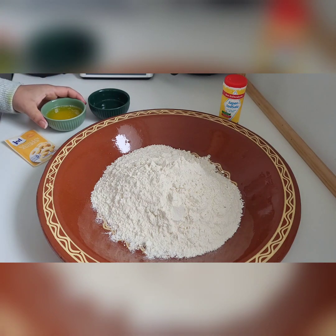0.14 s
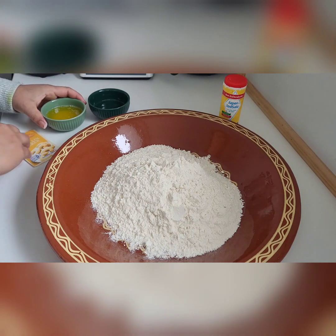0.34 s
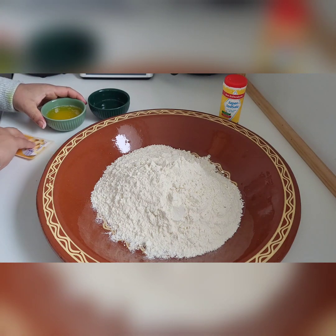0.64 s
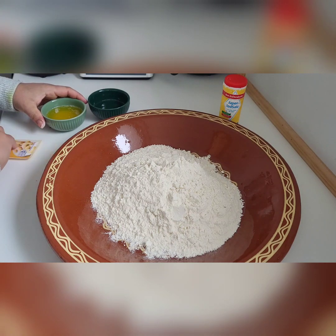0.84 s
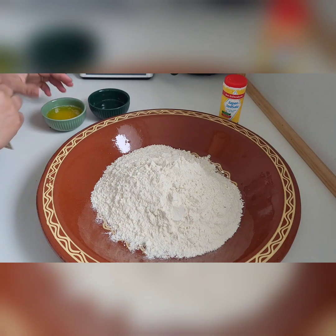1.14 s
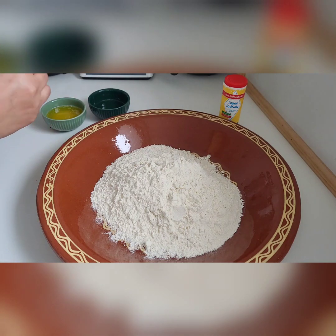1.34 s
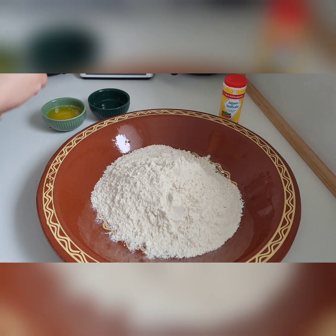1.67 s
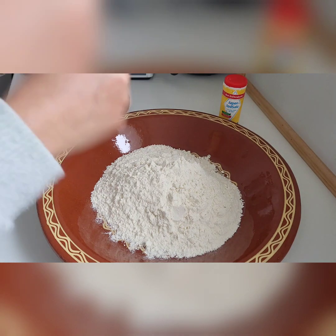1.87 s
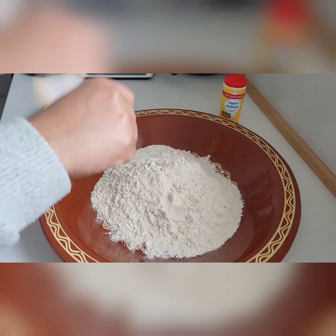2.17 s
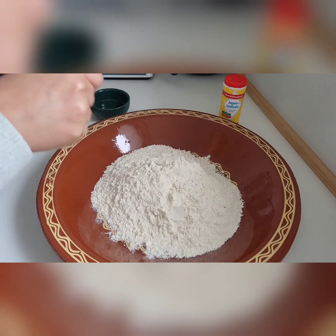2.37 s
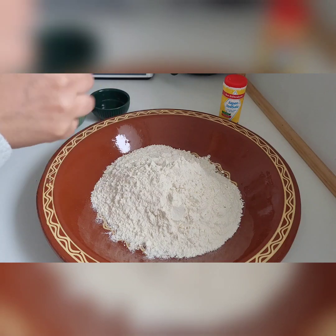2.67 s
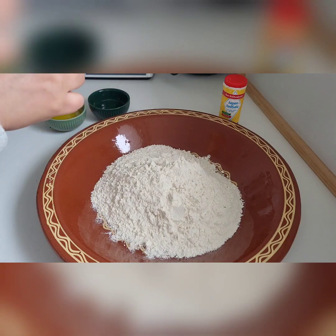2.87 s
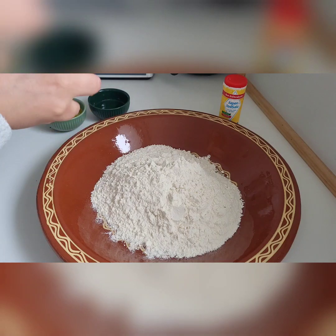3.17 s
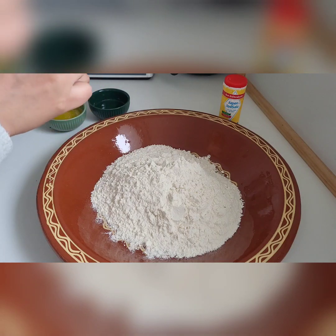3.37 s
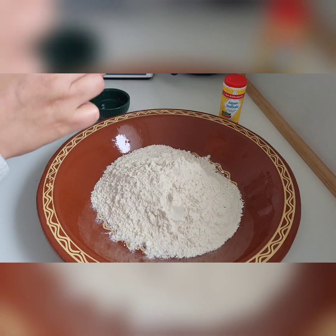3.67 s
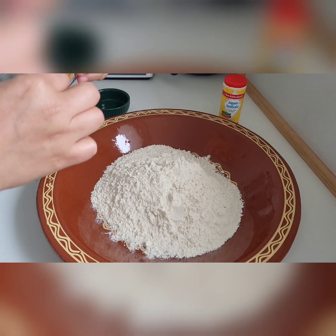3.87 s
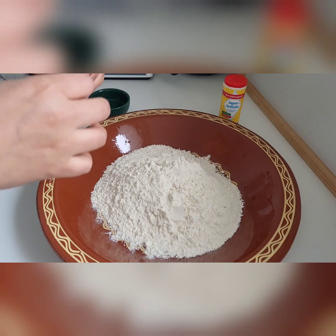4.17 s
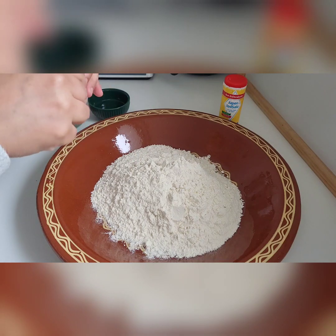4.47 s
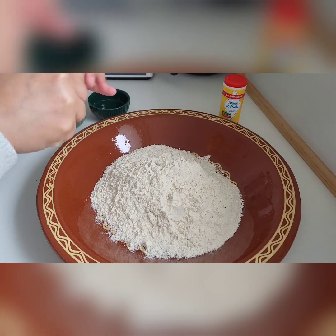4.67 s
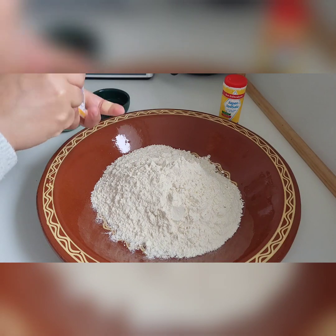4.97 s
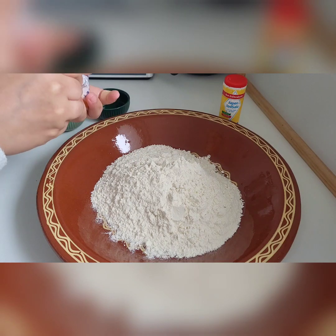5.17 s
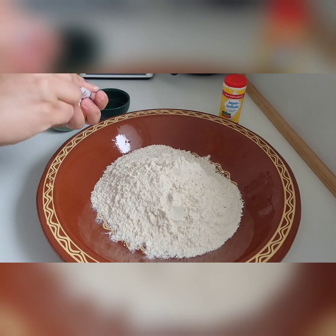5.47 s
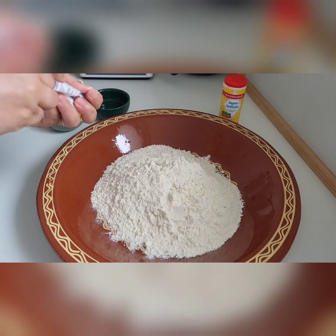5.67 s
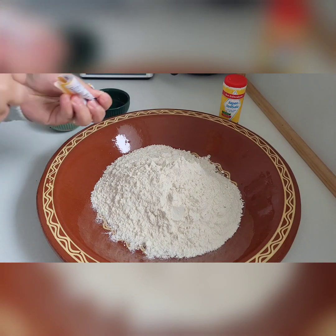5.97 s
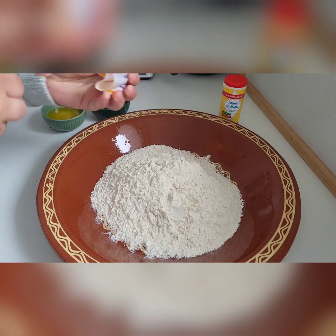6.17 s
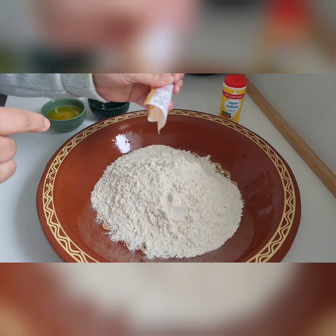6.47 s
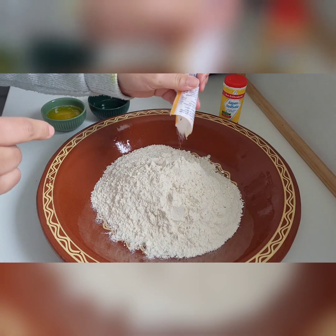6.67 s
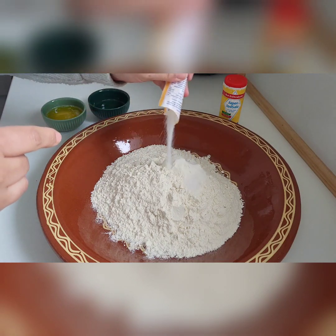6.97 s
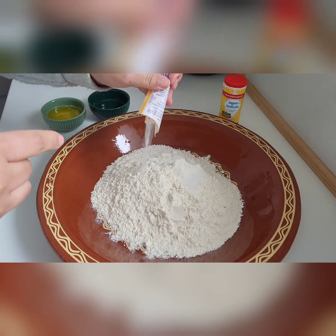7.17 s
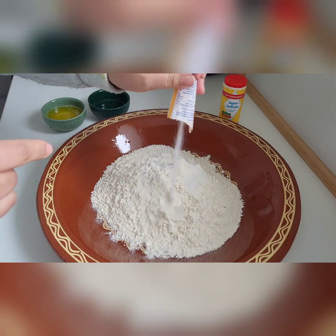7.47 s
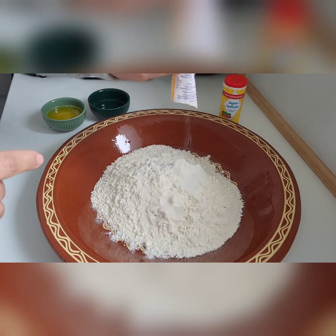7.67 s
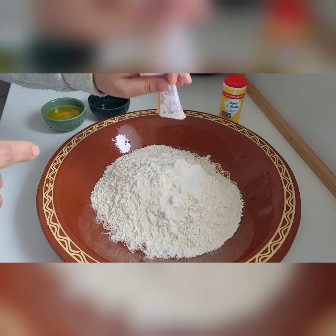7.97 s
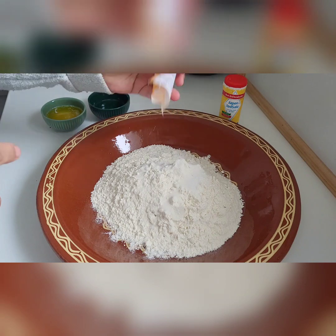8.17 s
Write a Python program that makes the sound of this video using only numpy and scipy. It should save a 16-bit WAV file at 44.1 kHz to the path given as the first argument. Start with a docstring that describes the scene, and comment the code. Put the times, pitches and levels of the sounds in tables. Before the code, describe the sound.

Crinkly paper packet handling: brisk shaking, small crackles, one short dry rip, more crumpling, then a quiet powdery trickle in a softly humming kitchen.

```python
"""Paper sachet in a kitchen

A sachet is slid off a counter, shaken, creased, torn open and emptied, over a faint appliance hum.
Buckling folds are noise bursts in a resonance with decaying panel modes; friction, fibres and powder
are random grains of coloured noise; the hum is a sum of sines. Diffuse decaying echoes answer the paper."""
import sys
import numpy as np
from scipy import signal
from scipy.fft import rfft, irfft, next_fast_len
from scipy.io import wavfile
from scipy.ndimage import map_coordinates

SR = 44100
rng = np.random.default_rng(int(sys.argv[2]) if len(sys.argv) > 2 else 0)


def int16_out(signal):
    """Quantize to a 16-bit WAV file."""
    q = np.round(np.clip(np.atleast_2d(signal).T, -1, 1) * 32767)
    wavfile.write(sys.argv[1], SR, q.astype(np.int16))


N = 367353
TIME = np.arange(N) / SR

# Levels in the tables are relative: each source trims its layers as it mixes them.
# Lines of the hum. Each row: frequency in Hz, level in dB.
HUM_LINES = [(49.3, 2), (98.6, -17), (147.9, -17), (202, -26.5)]
# Spectrum of the still air. Each row: frequency in Hz, gain in dB.
AIR_SPECTRUM = [(20, -18), (45, -2.5), (70, 5.5), (130, -6.5), (200, -11), (320, -12.5), (450, -24),
                (800, -30), (1300, -34), (1850, -22.5), (2600, -37.5), (5000, -37), (16000, -37.5)]
# Pushes along the counter. Each row: start in seconds, length in seconds, attack in seconds,
# friction level in dB, flexing panel level in dB.
SLIDE_STROKES = [(0.22, 0.08, .03, -59, -74.5), (0.33, .14, .02, -66, -76), (0.492, .05, .006, -48, -61),
                 (0.552, 0.043, 0.0024, -38, -50), (0.63, 0.23, 0.013, -48.5, -70),
                 (0.793, .04, .002, -48, -54.5), (0.876, 0.063, 0.0045, -47, -57)]
# Spectrum of paper scuffing over the counter. Each row: frequency in Hz, density in dB per Hz.
FRICTION_SPECTRUM = [(1500, -14), (2800, -12.5), (4500, -4.5), (6000, -5), (6900, -5), (7500, -2),
                     (8100, -3), (10500, -12.5), (14000, -8), (16000, -8)]
# Spectrum of the flexing paper panel. Each row: frequency in Hz, density in dB per Hz.
PANEL_SPECTRUM = [(100, -19.5), (250, -21.5), (450, -10), (750, -7.5), (1050, -5), (1300, -4), (1600, 1),
                  (2100, -3.5), (2700, -2), (3500, -10.5), (7000, -32)]
# Buckling folds. Each row: start in seconds, crack level in dB, crack resonance in Hz,
# panel level in dB, panel main mode in Hz.
FOLD_SNAPS = [(0.493, -41.5, 9700, -59, 700), (0.5483, -39.5, 6600, -42.5, 1500),
              (0.5697, -25.5, 7000, -49, 1800), (0.7905, -31, 7100, -44, 2550),
              (0.8739, -37, 6000, -43, 1690), (0.957, -43.5, 4680, -51.5, 1510),
              (1.0643, -34.5, 6700, -41, 2780), (1.128, -29.5, 5630, -65, 2680),
              (1.1425, -40, 7300, -52, 2300), (1.272, -47, 6070, -49, 854), (1.3366, -40, 6060, -44, 2740),
              (1.4607, -25.5, 7950, -34.5, 1430), (1.4716, -26, 7150, -33, 1450),
              (1.6057, -55, 4100, -36, 2625), (1.666, -31.5, 6840, -41.5, 2400),
              (1.6855, -31.5, 6200, -30.5, 2590), (1.741, -26, 7050, -27, 2500),
              (1.79, -34, 6340, -34.5, 1500), (1.8414, -23.5, 6100, -33, 1860),
              (1.8873, -29, 6420, -32, 1700), (1.896, -18, 7800, -21, 1670), (1.92, -19, 6610, -38.5, 2400),
              (1.9321, -17, 6640, -19.5, 2720), (2.0207, -15.5, 4410, -26.5, 2700),
              (2.0442, -18.5, 6200, -26, 2280), (2.1283, -25, 6500, -29, 2390),
              (2.1438, -20.5, 7050, -17.5, 1810), (2.174, -19.5, 6560, -28, 2400),
              (2.1866, -20, 7850, -50, 1680), (2.2247, -24.5, 7150, -28, 1720),
              (2.2394, -41, 5800, -36, 1690), (2.2705, -27, 6400, -33.5, 2700),
              (2.2899, -20, 5700, -24, 2240), (2.394, -33, 5230, -32.5, 1640),
              (2.4107, -32.5, 5900, -41, 1550), (2.472, -61, 6000, -39, 2420),
              (2.5305, -34, 5830, -37, 2030), (2.5954, -38.5, 6900, -41.5, 2420),
              (2.6231, -30, 6300, -35, 2500), (2.691, -30.5, 9900, -40.5, 2450),
              (2.7478, -41, 7400, -43, 1420), (2.7694, -45, 6700, -43, 1410),
              (2.8874, -33.5, 6400, -37.5, 1535), (2.9006, -30.5, 5570, -34.5, 2360),
              (2.9694, -24.5, 7360, -28.5, 1710), (3.0653, -28, 6100, -42, 1660),
              (3.1915, -36, 5800, -35, 1800), (3.2587, -37, 6150, -50, 1650),
              (3.347, -35, 9450, -46.5, 1240), (3.365, -35.5, 5200, -42, 1370),
              (3.444, -44, 5600, -36, 1470), (3.4598, -46, 6100, -36, 1430), (3.4852, -36, 5900, -36, 1560),
              (3.8342, -27, 10200, -50, 1540), (4.0762, -51, 10200, -82, 2500),
              (4.1395, -39, 6740, -49, 1520), (4.4891, -38, 5000, -45, 1370),
              (4.601, -36.5, 7750, -44, 1520), (4.6846, -33, 4850, -36, 1900),
              (4.7868, -40.5, 5300, -42.5, 1490), (5.034, -29.5, 7450, -29.5, 2334),
              (5.0806, -26.5, 7100, -27.5, 2180), (5.1339, -25, 5900, -27, 2415),
              (5.223, -39, 5700, -38, 1530), (5.2368, -38.5, 6250, -30.5, 2210),
              (5.2472, -36, 4700, -33, 1880), (5.3082, -53, 4300, -33.5, 1875),
              (5.3576, -42.5, 6600, -46, 2280), (5.389, -44, 4700, -32.5, 1610),
              (5.4296, -30.5, 5650, -35, 1830), (5.4406, -50, 5400, -36, 960),
              (5.478, -27.5, 5070, -42, 1570), (5.4913, -26, 5900, -26, 1565),
              (5.6188, -47, 7800, -39, 1950), (5.6522, -39, 6700, -35, 1570), (5.967, -32, 5700, -27, 1660),
              (6.3135, -35, 5400, -45, 1950), (7.847, -49.5, 8700, -69.5, 1800),
              (7.9068, -48.5, 8700, -71, 1820), (8.1769, -53.5, 8800, -73.5, 1800)]
# Colour shared by all snaps. Each row: frequency in Hz, gain in dB.
SNAP_SPECTRUM = [(100, 0.5), (250, 1.5), (450, -1), (750, -0.5), (1100, -3), (3000, -0.5), (4200, 1),
                 (6500, -3.5), (8200, 1.5), (10000, -5.5), (13500, 1.5), (16000, 3.5)]
# Finger strokes. Each row: start in seconds, length in seconds, attack in seconds,
# crackle level in dB, flexing panel level in dB.
FINGER_STROKES = [(1.065, 0.12, 0.0023, -49, -47.5), (1.26, 0.062, 0.0052, -53.5, -51.5),
                  (1.58, 0.14, 0.014, -52, -51), (1.688, .15, .002, -52, -45),
                  (1.843, 0.046, .002, -38.5, -48), (2.38, 0.086, .01, -45, -40),
                  (2.53, .25, 0.0081, -42.5, -55), (2.89, 0.029, 0.0092, -42, -35),
                  (2.97, 0.13, .002, -55, -43.5), (3.192, 0.063, .002, -53, -56),
                  (3.352, 0.12, 0.0023, -41.5, -38), (3.96, 0.065, .02, -49, -54.5),
                  (4.145, 0.12, .003, -62, -54), (4.26, 0.037, 0.01, -55, -68),
                  (4.415, 0.065, .004, -56.5, -67.5), (4.49, 0.029, 0.0022, -51, -62),
                  (4.57, 0.048, 0.0082, -45.5, -45), (4.604, 0.079, 0.0042, -38.5, -46.5),
                  (4.72, 0.1, 0.011, -49, -53), (4.945, 0.031, 0.012, -44.5, -55),
                  (5.035, 0.14, 0.0091, -37, -35.5), (5.232, 0.026, .007, -40, -34),
                  (5.39, 0.15, .006, -53.5, -45.5), (5.488, 0.056, .004, -42, -36.5),
                  (5.59, 0.18, 0.0099, -46, -52), (5.815, 0.048, .006, -46, -53.5),
                  (6.03, 0.11, .015, -48.5, -56), (6.24, 0.19, .03, -68, -81),
                  (6.44, 0.069, 0.026, -42.5, -58.5), (6.58, 0.042, 0.026, -47.5, -63),
                  (7.6, 0.12, .03, -61, -76.5), (7.85, 0.095, 0.039, -55.5, -67),
                  (7.97, 0.092, .008, -59.5, -63.5), (8.18, 0.033, 0.019, -55, -67.5),
                  (8.24, 0.11, .02, -65.5, -71)]
# Spectrum of fine wrinkles under the fingers. Each row: frequency in Hz, density in dB per Hz.
CRACKLE_SPECTRUM = [(1500, -24), (2800, -5.5), (4000, -0.5), (6500, -1.5), (8200, 0.5), (10000, -6),
                    (14000, -4), (16000, -2.5)]
# Powder slaps. Each row: slap in seconds, swell in seconds, fade in seconds,
# crackle level in dB, panel level in dB.
POWDER_SLAPS = [(1.464, .015, 0.063, -27.5, -35.5), (1.922, 0.072, 0.043, -21, -28.5),
                (2.028, 0.089, 0.048, -19.5, -32), (2.17, 0.085, 0.074, -23.5, -22),
                (2.288, 0.055, 0.045, -20, -24.5), (5.972, 0.031, 0.025, -23, -31.5)]
# Spectrum of wrinkles struck by the powder. Each row: frequency in Hz, density in dB per Hz.
SLAP_SPECTRUM = [(1500, -23.5), (2800, -6), (3900, -0.5), (5200, -4), (6500, -6), (8000, -3.5),
                 (9200, -7.5), (11000, -11.5), (13500, -4.5), (16000, -9)]
# Course of the tear. Each row: time in seconds, ripping speed in dB.
TEAR_SPEED = [(3.48, -52), (3.514, -33.5), (3.704, -29), (3.768, -32.5), (3.844, -30), (3.868, -29),
              (3.93, -57.5)]
# Spectrum of breaking fibres. Each row: frequency in Hz, density in dB per Hz.
FIBRE_SPECTRUM = [(1530, -33), (2600, -18), (3380, -10.5), (3680, -1), (4220, -6.5), (6210, -5), (6740, -8),
                  (7970, 0), (8970, -9), (9780, -4.5), (11500, -15), (15000, -42), (22000, -120)]
# Spectrum of the sheet shaken by the rip. Each row: frequency in Hz, density in dB per Hz.
SHEET_SPECTRUM = [(88, -39), (150, -10.5), (183, -21), (233, -10.5), (435, -8.5), (506, -4.5), (805, -2.5),
                  (996, 1.5), (1300, -3), (1540, -1.5), (3000, -1), (3900, -27), (6600, -120)]
# Spectrum of the finest tearing fizz. Each row: frequency in Hz, density in dB per Hz.
FIZZ_SPECTRUM = [(8000, -39), (11000, -8.5), (13500, 2), (16000, -4)]
# Course of the pour. Each row: time in seconds, flow in dB.
POUR_FLOW = [(6.63, -66), (6.65, -56), (6.694, -42), (6.858, -41), (7.01, -46.5), (7.032, -43),
             (7.212, -49.5), (7.416, -44), (7.474, -47.5), (7.6, -67.5)]
# Spectrum of sliding powder. Each row: frequency in Hz, density in dB per Hz.
POWDER_SPECTRUM = [(290, -60), (500, -19), (522, -36), (578, -33), (740, -31.5), (1340, -16.5), (1460, -16),
                   (2460, -8), (3290, -8.5), (3590, -3.5), (6330, -6), (7860, 0), (9220, -7.5), (15100, -5),
                   (16000, -7)]
# Decay of the room. Each row: frequency in Hz, time to fall 60 dB in seconds.
ROOM_DECAY = [(200, 0.37), (600, 0.34), (1500, 0.37), (4000, 0.31), (8000, 0.33), (15000, 0.27)]
# Correlation of left and right. Each row: frequency in Hz, correlation from 0 to 1.
LEFT_RIGHT_LIKENESS = [(60, 0.58), (250, 0.76), (500, 0.55), (1000, 0.33), (3000, 0.049), (12000, 0.055)]

HUM_DB, HUM_WAVER_DB, HUM_WAVER_RATE = -53.5, 1.26, 2.6  # 0 dB line's rms, waver scale, knots a second
FOLLOW_S, FOLLOW_DB = .008, -11.5  # mean delay and relative level of the neighbouring buckle
SNAP_PAN_DB = 5.5  # standard deviation of the left-right level difference
SHAKE_RANGE_DB = 24  # rise over one swell time, fall over one fade time
SHEET_FOLLOWS, FIZZ_FOLLOWS = 0.58, 2.6  # dB for each dB of ripping speed
FLUTTER_DB, FLUTTER_RATE = 1.9, 45  # depth scale of the rip's flutter, knots a second
TOP_HZ = 15900  # the recorder's band limit


def amp(db):
    """Amplitude is an exponential function of level in decibels."""
    return 10 ** (np.asarray(db) / 20)


def unit(x):
    """Division by the root mean square normalises a signal to rms 1."""
    return x / np.sqrt(np.mean(x ** 2) + 1e-20)


def along(points, hz):
    """A curve given at a few frequencies is interpolated on a logarithmic axis."""
    f, v = np.transpose(points)
    return np.interp(np.log(hz + 1), np.log(f + 1), v)


def filtered(x, response):
    """Linear filtering is multiplication by a response in the frequency domain."""
    n = x.shape[-1]
    m = next_fast_len(n + 8192)  # zero padding
    return irfft(rfft(x, m) * response(np.fft.rfftfreq(m, 1 / SR)), m)[..., :n]


def coloured(x, spectrum):
    """A spectral envelope in dB shapes the signal."""
    return filtered(x, lambda hz: amp(along(spectrum, hz)))


def spaced(pair):
    """Two spaced microphones: mixing mid and side gives unrelated signals a set correlation."""
    def mid_side_gains(hz):
        turn = np.arccos(np.clip(along(LEFT_RIGHT_LIKENESS, hz), -1, 1)) / 2
        return np.array([np.cos(turn), np.sin(turn)])
    mid, side = filtered(pair, mid_side_gains)
    return np.array([mid + side, mid - side])


def wobble(rate):
    """A slow fluctuation is a spline through random knots, mirrored after each 128."""
    return map_coordinates(rng.standard_normal(size=128), [TIME * rate], mode="mirror")


def grains(spectrum, rate, spread_db, life, bed):
    """Random releases, rate a second, decay over life seconds above a steady noise bed; rms 1."""
    size_db = spread_db * np.clip(rng.standard_normal(N), -2, 2)
    releases = (rng.random(N) < rate / SR) * amp(size_db) ** 2
    energy = signal.lfilter([1], [1, -np.exp(-1 / (life * SR))], releases)
    envelope = np.sqrt(energy / energy.mean() + abs(bed))
    bursts = envelope * rng.standard_normal((2, N))
    return unit(coloured(spaced(bursts), spectrum))


def strokes(rows, release, ease_db):
    """Sliding contact takes hold exponentially, eases along its length and lets go exponentially."""
    gains = np.zeros((2, N))
    for s, length, attack, *level_db in rows:
        part = slice(max(int(s * SR) - SR // 8, 0), int((s + length) * SR) + SR // 4)
        t = TIME[part] - s
        grip = np.exp(np.minimum(t, 0) / attack - np.maximum(t - length, 0) / release)
        ease = amp(-ease_db * np.clip(t / length, 0, 1))
        gains[:, part] += amp(level_db)[:, None] * grip * ease
    return gains


def gesture(rows, fade=0.015):
    """A continuous motion has a level linear in dB between points, fading to silence outside them."""
    s, *cols = np.transpose(rows)
    gate = np.clip(np.minimum(TIME - s[0], s[-1] - TIME) / fade + 1, 0, 1)
    return np.array([gate * amp(np.interp(TIME, s, c)) for c in cols])


def background():
    """A hum is a sum of nearly harmonic sines, here wavering in pitch and level over noise of still air."""
    clock = TIME + 0.00064 * wobble(0.73)
    hum = 0
    for hz, db in HUM_LINES:
        hum = hum + amp(db) * np.sin(2 * np.pi * (hz * clock + rng.random()))
    hum = np.sqrt(2) * hum  # a line at 0 dB has rms 1
    level = amp(HUM_DB + HUM_WAVER_DB * wobble(HUM_WAVER_RATE))
    air = unit(coloured(spaced(rng.standard_normal((2, N))), AIR_SPECTRUM))
    return level * hum * amp([[-1.3], [1.3]]) + amp(-63.5) * air


def slide():
    """Dry friction on the smooth counter releases fine scuffs and flexes the paper panel."""
    friction, panel = strokes(SLIDE_STROKES, release=0.023, ease_db=5)
    scuff = friction * grains(FRICTION_SPECTRUM, rate=500, spread_db=3, life=.0007, bed=2.5)
    flex = panel * grains(PANEL_SPECTRUM, rate=120, spread_db=8, life=.002, bed=1.9)
    return amp(-3) * scuff + amp(-2) * flex


def resonate(x, hz, q):
    """A damped resonance passes a band whose width is its frequency over q."""
    return signal.lfilter(*signal.iirpeak(min(hz, SR / 3), max(q, .75), SR), x)


def burst(hz, q, life, after_db, after_life, top_hz):
    """A sudden release and weak aftershiver excite one resonance; rms 1 over the first 5 ms."""
    t = np.arange(SR // 16) / SR
    envelope = np.exp(-t / life) + amp(after_db) * np.exp(-t / after_life)
    ring = resonate(envelope * rng.standard_normal((2, len(t))), hz, q)
    ring = signal.lfilter(*signal.butter(2, min(top_hz, SR * 4 / 9), fs=SR), ring)
    return ring / np.sqrt(np.mean(ring[:, :SR // 200] ** 2, axis=1, keepdims=True))


def panel_modes(hz, t60):
    """A bent sheet rings in one main mode and four weaker ones, redrawn for each new shape."""
    t = np.arange(SR // 16) / SR
    mode_hz = hz * np.r_[1, np.exp(rng.uniform(-.55, .45, 4))][:, None]
    strength = np.r_[1, rng.uniform(.2, .5, 4)]
    phase = 2 * np.pi * rng.random((2, 5, 1))
    # sum over modes m, separately in each channel c
    ring = np.einsum("m,cmt->ct", strength, np.sin(2 * np.pi * mode_hz * t + phase))
    onset = 1 - np.exp(-t / 0.00097)
    return ring * amp(-60 * t / t60) * onset


def buckle(crack_db, crack_hz, panel_db, panel_hz):
    """A fold snaps through at the crease and sets the paper panel ringing for a moment."""
    crack = burst(crack_hz, q=1.92, life=0.0025, after_db=-23, after_life=0.011, top_hz=18900)
    push = burst(panel_hz * 1.15, q=0.65, life=0.003, after_db=-9.5, after_life=0.012, top_hz=3070)
    panel = amp(-6.0) * push + amp(2.5) * panel_modes(panel_hz, t60=0.022)
    pan_db = SNAP_PAN_DB * rng.standard_normal()
    snap = amp(crack_db - 2.0) * crack + amp(panel_db + 1.6) * panel
    return snap * amp([[pan_db / 2], [-pan_db / 2]])


def snaps():
    """Buckling spreads: each snap sets off a weaker one in a neighbouring fold of another size."""
    out = np.zeros((2, N + SR))
    for s, crack_db, crack_hz, panel_db, panel_hz in FOLD_SNAPS:
        delay = FOLLOW_S * (.5 + rng.random())
        tuning = np.exp(.18 * rng.standard_normal())
        first = buckle(crack_db, crack_hz, panel_db, panel_hz)
        second = amp(FOLLOW_DB) * buckle(crack_db, crack_hz * tuning, panel_db, panel_hz * tuning)
        for start, snap in (s, first), (s + delay, second):
            out[:, round(start * SR):][:, :snap.shape[1]] += snap
    return coloured(spaced(out[:, :N]), SNAP_SPECTRUM)


def handling():
    """Sliding fingers work small wrinkles, which give way as fine crackle and panel flexing."""
    crackle, panel = strokes(FINGER_STROKES, release=0.012, ease_db=4)
    fine = crackle * grains(CRACKLE_SPECTRUM, rate=240, spread_db=9.5, life=0.0014, bed=2.0)
    flex = panel * grains(PANEL_SPECTRUM, rate=69, spread_db=10.5, life=0.0022, bed=0.46)
    return amp(-1.5) * fine + amp(-6.5) * flex


def jerks():
    """A shake swells exponentially to its slap and then decays exponentially."""
    gains = np.zeros((2, N))
    for s, swell, fade, *level_db in POWDER_SLAPS:
        away = np.maximum((s - TIME) / swell, (TIME - s) / fade)
        gains += amp(level_db)[:, None] * amp(-SHAKE_RANGE_DB * np.minimum(away, 10))
    return gains


def shakes():
    """Powder slaps against the paper and many wrinkles give way together."""
    crackle, panel = jerks()
    fine = crackle * grains(SLAP_SPECTRUM, rate=290, spread_db=4.0, life=0.00037, bed=0.93)
    flex = panel * grains(PANEL_SPECTRUM, rate=350, spread_db=10, life=0.0051, bed=0.27)
    return amp(-2.0) * fine + amp(-3.0) * flex


def flutter():
    """A rip catches and runs on, so its level fluctuates at random."""
    return amp(FLUTTER_DB * wobble(FLUTTER_RATE))


def tear():
    """Breaking fibres shake the sheet; fizz grows faster than speed, so a faster rip is brighter."""
    rip_level = gesture(TEAR_SPEED)[0]
    top = rip_level.max()
    speed = rip_level / top
    fibres = grains(FIBRE_SPECTRUM, rate=1300, spread_db=-1, life=0.0013, bed=0.23)
    shaking = grains(SHEET_SPECTRUM, rate=1100, spread_db=7.0, life=0.0011, bed=0.4)
    finest = grains(FIZZ_SPECTRUM, rate=2000, spread_db=4.0, life=0.00054, bed=.2)
    rip = speed * flutter() * fibres
    sheet = speed ** SHEET_FOLLOWS * flutter() * shaking
    fizz = speed ** FIZZ_FOLLOWS * finest
    return top * (amp(-4) * rip + amp(-12.5) * sheet + fizz)


def pour():
    """Granular flow over the paper lip merges thousands of tiny impacts a second into a hiss."""
    hiss = grains(POWDER_SPECTRUM, rate=7300, spread_db=2, life=0.00037, bed=0.76)
    return amp(1.27) * gesture(POUR_FLOW)[0] * hiss


def room_tail(gap=0.00056, build=0.0028):
    """A diffuse echo is noise in which each frequency decays at its own rate; unit energy."""
    hz, t, z = signal.stft(rng.standard_normal((2, SR * 3 // 4)), SR, nperseg=256)
    decay = amp(-60 * t / along(ROOM_DECAY, hz)[:, None])
    tail = signal.istft(z * decay, SR, nperseg=256)[1]
    t = np.arange(tail.shape[1]) / SR
    tail = spaced(tail) * np.clip((t - gap) / build, 0, 1)
    return tail / np.linalg.norm(tail, axis=1, keepdims=True)


def kitchen(x, wet_db, count=32):
    """Reverberation is convolution; moving hands change the echo pattern, redrawn for each part."""
    wet = np.zeros((2, N + SR))
    for part in np.array_split(np.arange(N), count):
        echo = signal.fftconvolve(x[:, part], room_tail(), axes=1)
        wet[:, part[0]:][:, :echo.shape[1]] += echo
    return x + amp(wet_db) * wet[:, :N]


def scene():
    """Superposition: the paper sounds excite the kitchen, and its background adds to them."""
    paper = slide() + snaps() + handling() + shakes() + tear() + pour()
    return kitchen(paper, wet_db=-2.5) + background()


def record(dry):
    """A steep low-pass response models the recorder's band limit."""
    return filtered(dry, lambda hz: 1 / (1 + (hz / TOP_HZ) ** 160))


dry = scene()
out = record(dry)
int16_out(out)
```